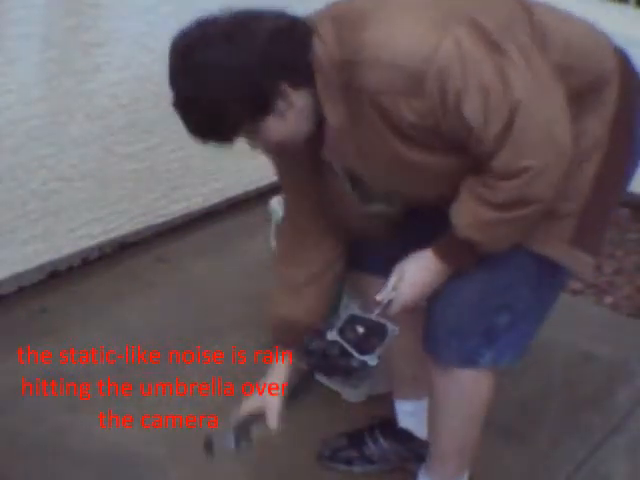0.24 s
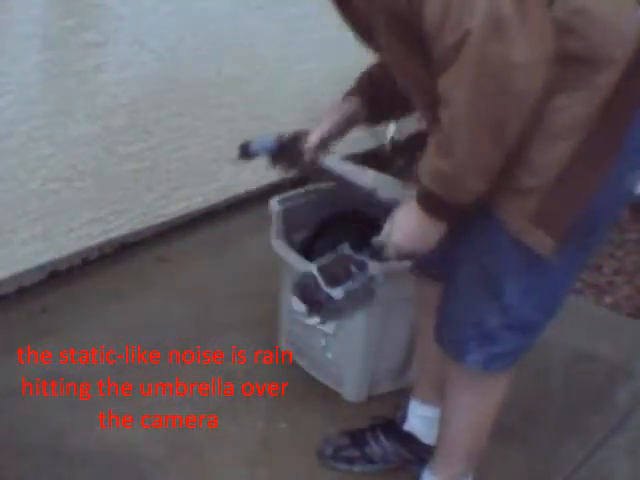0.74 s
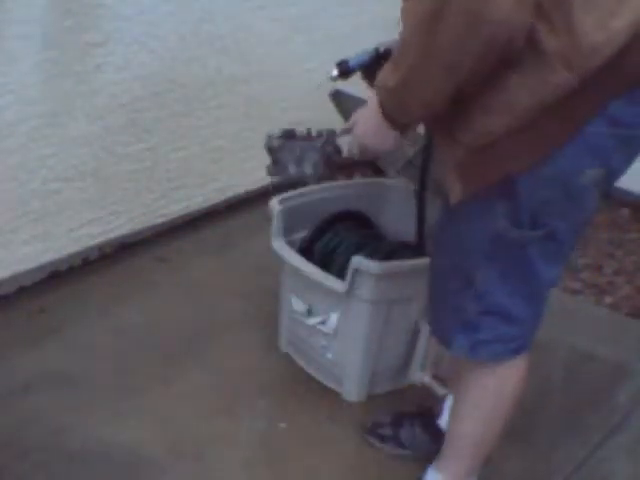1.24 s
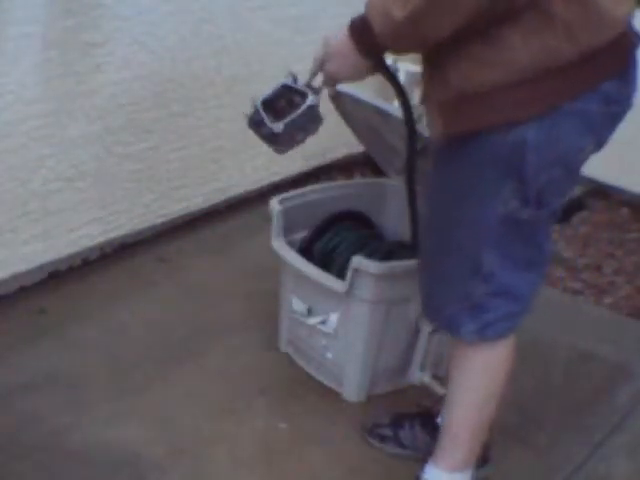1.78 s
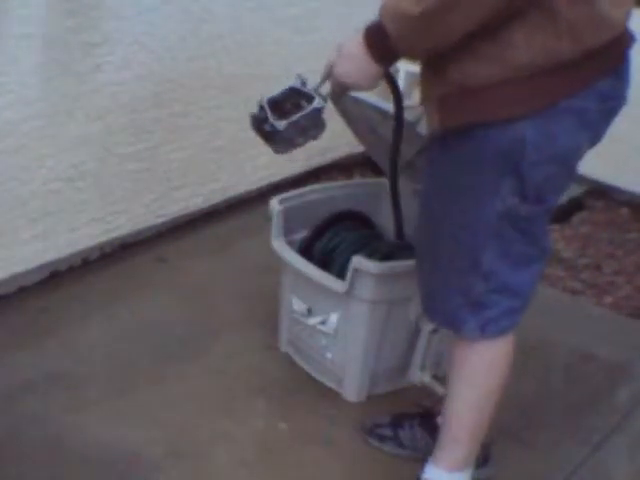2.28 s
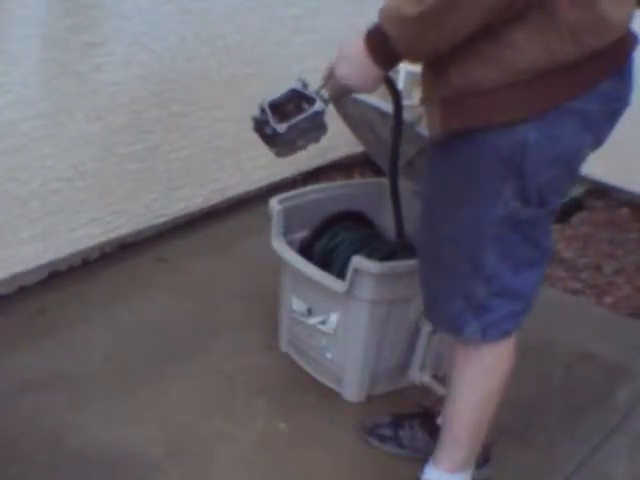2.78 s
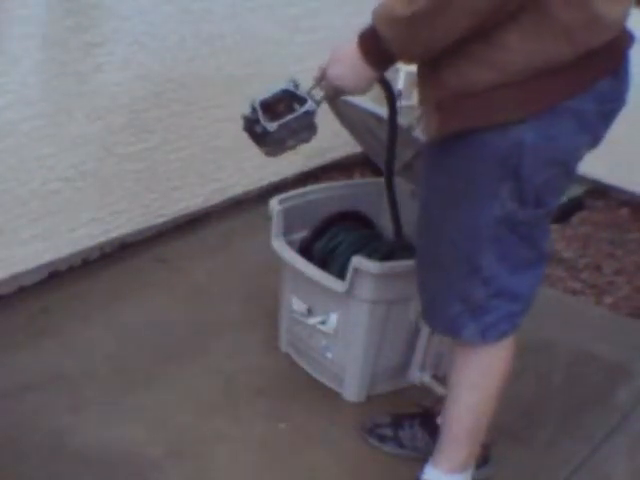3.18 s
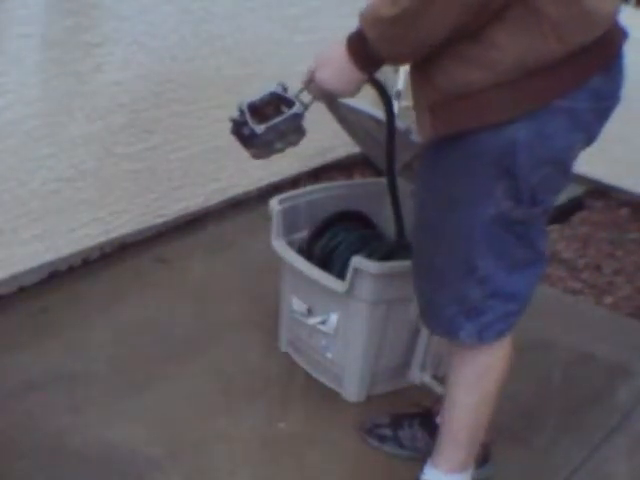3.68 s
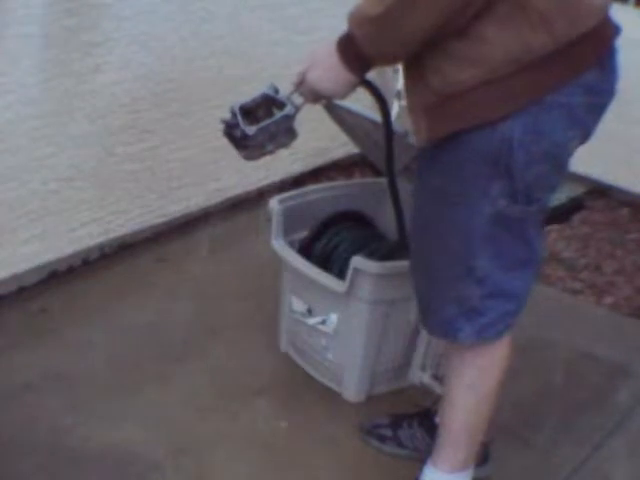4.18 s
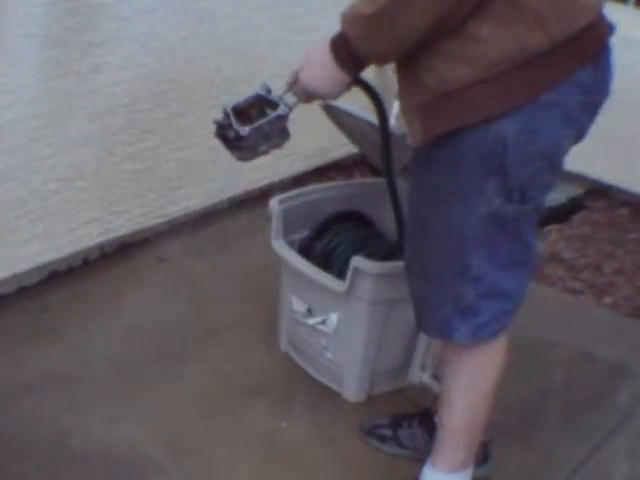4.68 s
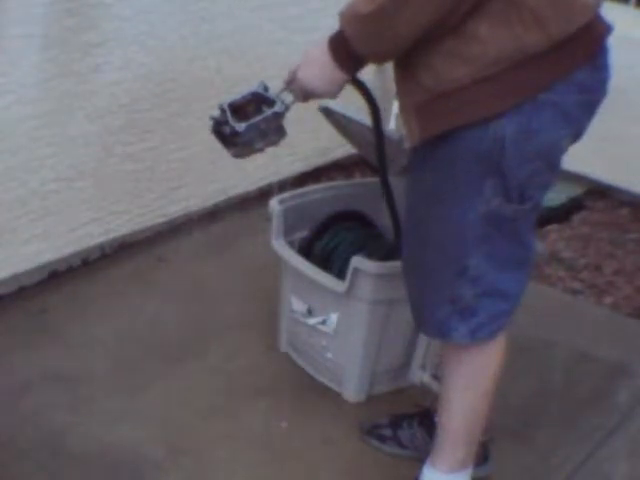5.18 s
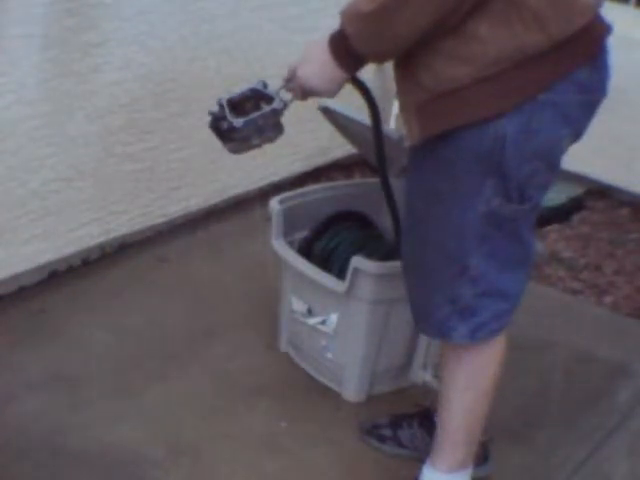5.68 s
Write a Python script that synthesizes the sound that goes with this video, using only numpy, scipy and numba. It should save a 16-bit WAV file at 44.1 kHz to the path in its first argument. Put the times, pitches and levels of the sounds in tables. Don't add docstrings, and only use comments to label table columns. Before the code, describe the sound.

Close, dry, static-like rain patter fills everything, with single fat drops popping out of it irregularly. Early on come faint scrapes and one boxy plastic knock with a brief hollow ring. Later, bright clicks and wet slaps on a metal piece and hissing bursts on concrete thicken the patter. Distant rain hisses behind; the lo-fi camera microphone sounds muffled on top and slightly overloaded.

```python
import sys
import numpy as np
from scipy import signal
from scipy.fft import rfft, irfft
from scipy.io import wavfile
from scipy.ndimage import uniform_filter1d
from numba import njit

SR = 44100
rng = np.random.default_rng(int(sys.argv[2]) if len(sys.argv) > 2 else 0)


def magnitude_from_level(level_db):
    exponent = np.asarray(level_db, float) / 20
    return 10 ** exponent


def dump(signal):
    limited = np.clip(np.atleast_2d(signal).T, -1, 1)
    pcm = np.round(limited * 32767).astype(np.int16)
    wavfile.write(sys.argv[1], SR, pcm)


N = 261954


def level(x, db):
    return x * magnitude_from_level(db) / np.sqrt(np.mean(x ** 2))


@njit
def ring(start, pole, size, n):
    out = np.zeros(n)
    for k in range(len(start)):
        z, i = size[k] + 0j, start[k]
        while i < n and abs(z) > .002 * abs(size[k]):
            out[i] += z.real
            z *= pole[k]
            i += 1
    return out


def strike(s, size, hz, t60):
    s, size, hz, t60 = (a.ravel() for a in np.broadcast_arrays(s, size, hz, t60))
    pole = np.exp(2j * np.pi * hz / SR - np.log(1000) / (t60 * SR))
    start = np.clip(s * SR, 0, N).astype(np.int64)
    return ring(start, pole, 1. * size, N)


def band(x, hz, width, order=2):
    edges = [max(hz - width / 2, 10), hz + width / 2]
    sos = signal.butter(order, edges, "band", fs=SR, output="sos")
    return signal.sosfilt(sos, x) * np.sqrt(SR / 2 / width)


def walk(rate_hz):
    k = int(SR / rate_hz)
    held = np.repeat(rng.standard_normal(N // k + 1), k)
    return uniform_filter1d(uniform_filter1d(held, k), k)[:N]


# (frequency [Hz], density [dB per Hz])
FAR_RAIN_SPECTRUM = [(20, -76), (200, -75.5), (403, -76), (700, -76), (1010, -75.5), (1830, -72),
                     (1400, -81.5), (2500, -78), (3420, -78.5), (4260, -81.5), (6160, -83), (8000, -85.5)]


def far_rain():
    hz, db = np.transpose(FAR_RAIN_SPECTRUM)
    f = np.maximum(np.arange(N // 2 + 1) * SR / N, 1)
    gain = magnitude_from_level(np.interp(np.log(f), np.log(hz), db))
    hiss = irfft(rfft(rng.standard_normal(N)) * gain, N) * np.sqrt(SR / 2)
    return hiss * magnitude_from_level(0.27 * walk(7.0))


# (frequency [Hz], level [dB rms])
WHINE_TONES = [(1000, -52), (7500, -64)]


def camera_whine():
    t = np.arange(N) / SR
    return sum(np.sqrt(2) * magnitude_from_level(db) * np.sin(2 * np.pi * hz * t) for hz, db in WHINE_TONES)


def rough_contact(rows):
    out, t = np.zeros(N), np.arange(SR // 4) / SR
    for s, ms, db, hz, width in rows:
        contact = rng.standard_normal(len(t)) * np.exp(-(1000 * t / ms) ** 2)
        sound = band(contact, hz, width)
        out[int(s * SR):][:len(t)] += level(sound, db) * np.sqrt(ms / 1000 / t[-1])
    return out


def struck_modes(rows):
    s, db, hz, t60 = np.transpose(rows)
    return uniform_filter1d(strike(s, magnitude_from_level(db), hz, t60), size=4)


# (time [s], length [ms], level [dB], mode [Hz], width [Hz])
BOX_CONTACTS = [(0.26, 48, -43, 200, 255), (0.341, 9.4, -33, 320, 160), (.345, 65, -37, 500, 200),
                (0.366, 40, -35.5, 171, 70.5), (0.409, 84, -41.5, 295, 300), (0.792, 13, -27, 330, 298),
                (0.793, 8.7, -32.5, 1370, 250), (.8, 8.6, -36, 810, 500), (0.798, 12, -30.5, 111, 80),
                (0.809, 14, -32.5, 553, 200), (.815, 10, -28.5, 940, 200), (.795, 45, -31.5, 805, 1400),
                (.85, 150, -42.5, 590, 700), (.9, 74, -43, 656, 80)]
# (time [s], peak [dB], frequency [Hz], t60 [s])
BOX_RINGS = [
    (0.752, -33, 244, 0.17),
    (0.802, -28, 233, 0.34),
    (.84, -28, 239, .1),
    (0.871, -28, 231, 0.11),
    (0.916, -33.5, 232, 0.079),
]


def box():
    return rough_contact(BOX_CONTACTS) + struck_modes(BOX_RINGS)


# (time [s], length [ms], level [dB], mode [Hz], width [Hz])
METAL_SLAPS = [
    (.015, 25, -35.5, 4900, 890),
    (3.159, 17, -37, 2900, 260),
    (3.198, 46, -35, 2500, 1600),
    (4.3762, 2.6, -34, 2090, 580),
    (4.38, 35, -30.5, 2880, 1490),
]
# (time [s], peak [dB], frequency [Hz], t60 [s])
METAL_PINGS = [
    (3.1949, -11, 2450, .011),
    (3.1951, -14, 3800, .012),
    (4.3768, -10, 3300, .011),
    (4.3771, -15, 4300, .011),
    (4.3768, -19, 2050, .014),
    (4.7869, -18, 3250, .016),
    (5.1443, -22, 5800, .035),
    (5.2136, -11, 6250, .014),
    (5.2134, -20, 3600, .012),
]


def metal_part():
    return rough_contact(METAL_SLAPS) + struck_modes(METAL_PINGS)


# (time [s], peak [dB])
HEAVIEST_DROPS = [(.2284, -16), (.4233, -16), (.4761, -16), (.6415, -13), (.6692, -17), (1.3493, -17),
                  (1.5475, -13), (1.8813, -17), (1.9245, -16), (2.0199, -16), (2.2268, -13), (2.288, -17),
                  (2.379, -15), (2.6784, -17), (3.4586, -16), (3.4813, -14), (3.6682, -17), (3.8105, -14),
                  (3.8744, -17), (3.9087, -17), (4.4787, -17), (4.7026, -16), (4.9606, -17), (5.0329, -15),
                  (5.0456, -16), (5.2645, -17), (5.4145, -15), (5.6196, -17), (5.8086, -16), (5.8604, -15)]
# (time [s], first peak [dB], length [ms], last peak [dB])
DROP_RUNS = [(.0063, -22, 12.7, -20), (.069, -20, 15.4, -23), (.1496, -21, 21.7, -21),
             (.1992, -18, 5.2, -23), (.2414, -18, 3.2, -18), (.3705, -20, 46.1, -18),
             (.5025, -20, 65.4, -18), (1.0196, -20, 23, -19), (1.078, -21, 14.5, -18),
             (1.2691, -19, 62.8, -18), (1.4135, -20, 29, -22), (1.5305, -19, 35.6, -21),
             (1.7876, -20, 31.2, -21), (1.8873, -20, 42.9, -20), (2.3453, -18, 58.2, -25),
             (2.4939, -20, 41.9, -19), (2.8834, -20, 75.8, -20), (3.0823, -21, 21.9, -21),
             (3.2871, -18, 40.7, -20), (3.8904, -20, 25.9, -19), (4.1652, -19, 43.4, -23),
             (4.2561, -21, 27.1, -19), (4.5279, -21, 46.2, -21), (4.711, -17, 4.5, -18),
             (4.8984, -20, 54, -19), (5.1008, -19, 89.3, -20), (5.3745, -18, 30.8, -20),
             (5.4167, -16, 19.7, -18), (5.7413, -19, 56, -18), (5.8465, -19, 43.9, -19)]
# (time [s], peak [dB])
LONE_DRIPS = [(.2993, -21), (.5846, -22), (.645, -19), (.7288, -20), (.9521, -22), (.9871, -22),
              (1.1632, -22), (1.3059, -23), (1.4936, -22), (1.6571, -22), (1.6795, -23), (2.008, -20),
              (2.1827, -21), (2.5626, -22), (2.767, -20), (2.9941, -20), (3.1657, -21), (3.2144, -22),
              (3.4974, -20), (3.5678, -23), (4.0661, -22), (4.3721, -21), (4.3768, -20), (4.5558, -21),
              (4.7433, -22), (4.9903, -21), (5.0643, -20), (5.2375, -21), (5.5798, -20), (5.6586, -22)]
FOLLOW_PER_S, FOLLOW_DB, FOLLOW_SPREAD_DB = 45, -24, 10
STRAY_DB, STRAY_TAIL_DB = -26, 0.5
WALL_LAG_S, WALL_DB = .0083, -9.5


def falls(count=75, size=3):
    s, db = np.transpose(HEAVIEST_DROPS)
    first_s, first_db, ms, last_db = np.transpose(DROP_RUNS)
    when, weight = rng.random((2, size, len(DROP_RUNS)))
    inside = np.arange(size)[:, None] < FOLLOW_PER_S * ms / 1000
    follow_s = (first_s + when * ms / 1000)[inside]
    follow_db = (FOLLOW_DB - FOLLOW_SPREAD_DB * weight)[inside]
    stray = rng.random((count, 2)).T
    stray_db = STRAY_DB + STRAY_TAIL_DB * np.log(1 - stray[1])
    rows = [(s, db), (s + WALL_LAG_S, db + WALL_DB),
            (first_s, first_db), (first_s + ms / 1000, last_db), (follow_s, follow_db),
            np.transpose(LONE_DRIPS), (stray[0] * N / SR, stray_db)]
    return np.concatenate(rows, axis=1)


# (time [s], length [ms], low band [dB], high band [dB])
FAT_SPLASHES = [(0.0058, 2.1, -20, -17), (0.605, 3.5, -28, -27), (3.196, 4.1, -22.5, -35.5),
                (3.225, 2.9, -40, -26), (3.3777, 2.5, -28, -30), (3.6519, 7.4, -23, -26),
                (3.7822, 1.1, -45, -26), (3.8306, 7.8, -25, -50), (4.1454, 7.8, -28, -23.5),
                (4.1798, 1.6, -35, -23), (4.2054, 3.5, -55, -22.5), (4.2566, 4.1, -31, -29),
                (4.377, 2.1, -16, -40), (4.3974, 3.1, -26, -34), (4.5749, 6.3, -26, -44),
                (4.6436, 5.5, -27, -34), (4.704, 2.6, -28, -22), (4.7195, 4.3, -23, -36),
                (4.754, 2.9, -21, -41), (4.7785, 1.6, -27, -28), (4.7853, 20, -27, -37),
                (4.7977, 2.8, -28, -31), (5.127, 6, -30, -26), (5.1443, 27, -32, -29.5),
                (5.2136, 3.9, -29, -20), (5.4487, 3.9, -21, -49), (5.5698, 2.3, -49, -29),
                (5.7516, 4.4, -22.5, -29), (5.8248, 4.1, -55, -20), (5.8896, 3.6, -30, -27)]
CROWN_DB, CROWN_MS, CROWN_TILT_DB = -8.5, .9, -20.5
SHAKE_FROM_S, SPECK_DB, SPECK_SPREAD_DB, SPECK_MS = 3.0, -36, 9.5, 2.3


def bursts(count=45):
    s, db = np.r_[HEAVIEST_DROPS, np.array(DROP_RUNS)[:, :2], LONE_DRIPS].T
    crowns = np.c_[s, CROWN_MS + 0 * s, db + CROWN_DB, db + CROWN_DB + CROWN_TILT_DB]
    when, chance = rng.random(count), rng.standard_normal((count, 3))
    speck_s = SHAKE_FROM_S + when * (N / SR - SHAKE_FROM_S)
    speck_db = SPECK_DB + SPECK_SPREAD_DB * np.clip(chance[:, 1:], -2, 1)
    specks = np.c_[speck_s, SPECK_MS * magnitude_from_level(4 * chance[:, 0]), speck_db]
    return np.r_[FAT_SPLASHES, crowns, specks]


# (time [s], patter [dB], spray [dB])
SHOWER_LEVELS = [(0.0, -33.5, -37.5), (0.23, -35.5, -51), (0.59, -35.5, -46), (0.81, -32, -45.5),
                 (1.24, -36, -46.5), (2.27, -34.5, -46.5), (2.4, -34, -46), (2.81, -33.5, -45),
                 (3.32, -33.5, -40.5), (3.59, -33, -42.5), (3.7, -32.5, -41.5), (4.12, -35.5, -42),
                 (4.47, -34.5, -42), (4.65, -34.5, -38), (4.86, -33.5, -39.5), (5.06, -34, -40.5),
                 (5.29, -32, -37.5), (5.94, -36, -42)]


def shower_gain(column):
    rows = np.transpose(SHOWER_LEVELS)
    return magnitude_from_level(np.interp(np.arange(N) / SR, rows[0], rows[column]))


# (centre [Hz], width [Hz])
SPLASH_RESONANCES = [(3300, 1000), (5750, 1200)]
CALM_SPRAY_DB, HIGH_SPRAY_DB, HIGH_SPRAY_RISE = -47.5, -4, 0.39
MIST_DB, MIST_T60_S = 14.5, 0.087


def splashes():
    s, ms, *levels_db = bursts().T
    ms = np.maximum(ms, .6)
    out, flurry, spray = 0, walk(45), shower_gain(column=2)
    high_spray = spray * magnitude_from_level(HIGH_SPRAY_DB) * (spray / magnitude_from_level(CALM_SPRAY_DB)) ** HIGH_SPRAY_RISE
    for (hz, width), db, band_spray in zip(SPLASH_RESONANCES, levels_db, (spray, high_spray)):
        crests = strike(s, magnitude_from_level(db - 7.5) * np.sqrt(1 + 2.6 / ms), 0, 0.0033 * ms)
        mist = strike(s, magnitude_from_level(np.minimum(db, -27) + MIST_DB) * np.sqrt(ms), 0, MIST_T60_S)
        flurry_db = np.minimum(2.3 * flurry + 2.6 * walk(70), 6)
        fizz = band_spray * (mist + magnitude_from_level(-7.0 + flurry_db))
        grain = rng.standard_normal(N) * magnitude_from_level(np.minimum(3 * walk(900), 4))
        droplets = (crests + fizz) * grain
        out = out + band(droplets, hz, width, order=1) + magnitude_from_level(-7.5) * band(droplets, 7400, 6800)
    return out


# (frequency [Hz], t60 [s], share [signed ratio])
CANOPY_MODES = [(230, .0026, -.37), (1060, .0093, .28), (1760, .005, 2.65), (3100, .0085, 1.)]
PUSH_SAMPLES, ECHO_SAMPLES, ECHO_SHARE = 23, 29, -.49


def canopy(s, size, detune, scatter_db):
    hz, t60, share = np.transpose(CANOPY_MODES)
    chance = rng.standard_normal((len(s), 2, len(hz)))
    mode_size = size[:, None] * share * magnitude_from_level(scatter_db * chance[:, 0])
    rings = strike(s[:, None], mode_size, hz * (1 + detune * chance[:, 1]), t60)
    push = np.hanning(PUSH_SAMPLES)
    direct = np.convolve(rings, push / push.sum(), "same")
    return direct + ECHO_SHARE * np.r_[np.zeros(ECHO_SAMPLES), direct[:-ECHO_SAMPLES]]


def patter(s, db, count=3200):
    chance = rng.random((count, 2)).T
    size = magnitude_from_level(np.minimum(-3.0 * np.log(1 - chance[1]), 9))
    drops = canopy(chance[0] * N / SR, size, detune=.1, scatter_db=2.5)
    scatter = np.minimum(strike(s, magnitude_from_level(db + 27.5), 0, 0.033), 1.5)
    crowded = level(drops * (0.74 + 0.49 * scatter), -4.0)
    return crowded * shower_gain(column=1) * magnitude_from_level(1.8 * walk(25.14))


def heavy_drops(s, db):
    size = magnitude_from_level(db + .55 * np.maximum(db + 20, 0))
    thud_size = magnitude_from_level(-17.0) * size ** 2 * (1 + .5 * rng.standard_normal(len(s)))
    thud = strike(s, thud_size, 110, 0.035)
    return canopy(s, size, detune=.035, scatter_db=1.3) + uniform_filter1d(thud, size=60)


def scene():
    single = falls()
    rain = heavy_drops(*single) + patter(*single) + splashes()
    return (rain + box() + metal_part() + far_rain() + camera_whine())[None]


def roll_off(x):
    return signal.sosfilt(signal.butter(12, 15800, fs=SR, output="sos"), x)


TOP_HZ = 8708
OFFSET, RAIL = -.3455, -.5


def record(dry):
    clipped = np.maximum(dry, RAIL - OFFSET)
    narrow = signal.sosfiltfilt(signal.cheby2(10, 40, TOP_HZ, fs=SR, output="sos"), clipped)
    narrow = narrow + magnitude_from_level(-99) * rng.standard_normal(N)
    return roll_off(np.maximum(narrow + OFFSET, RAIL - .002))


dry = scene()
out = record(dry)
dump(out)
```